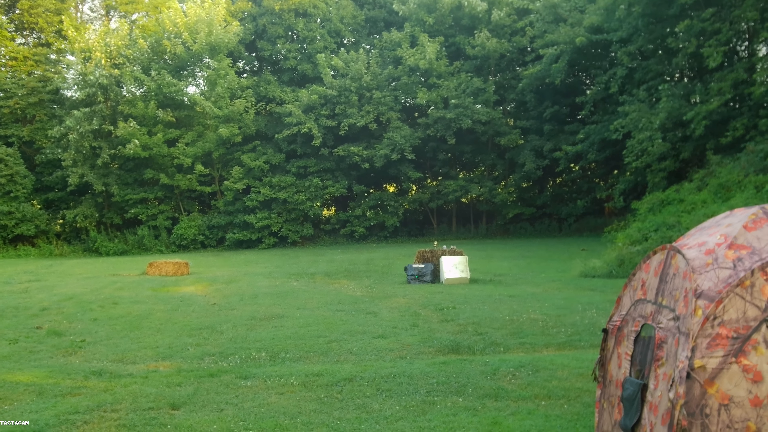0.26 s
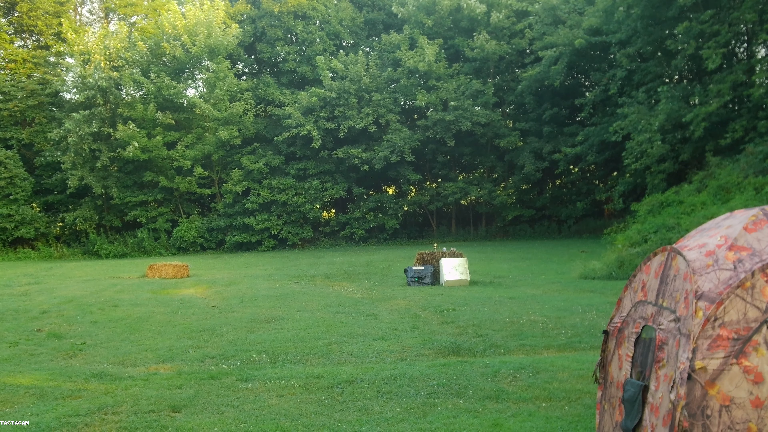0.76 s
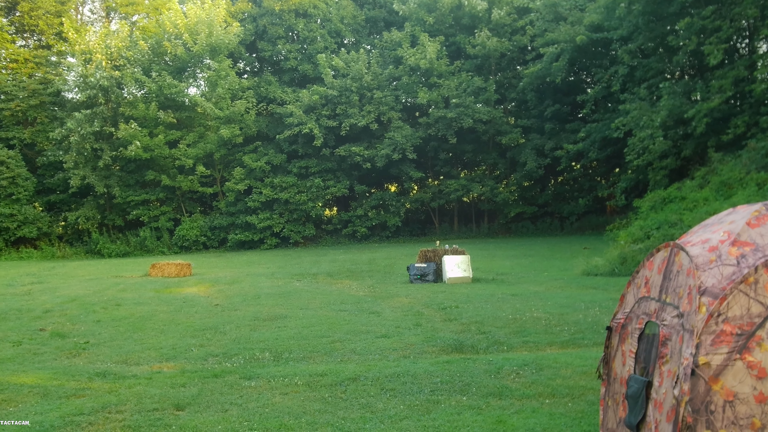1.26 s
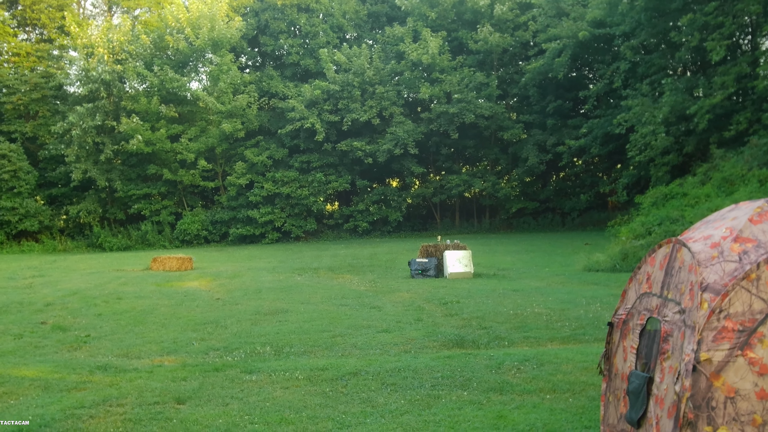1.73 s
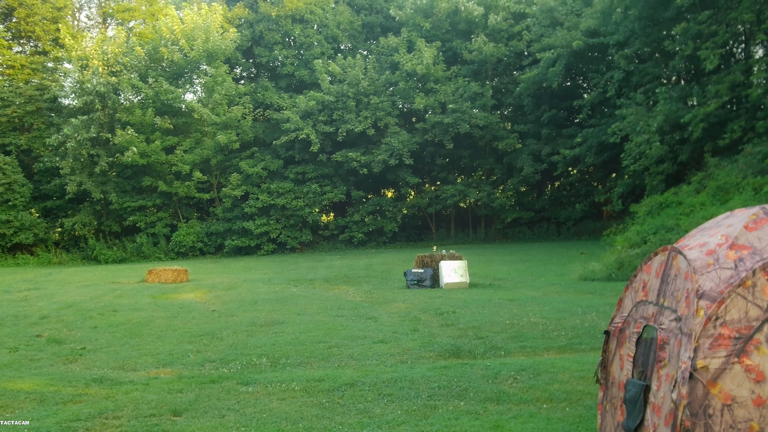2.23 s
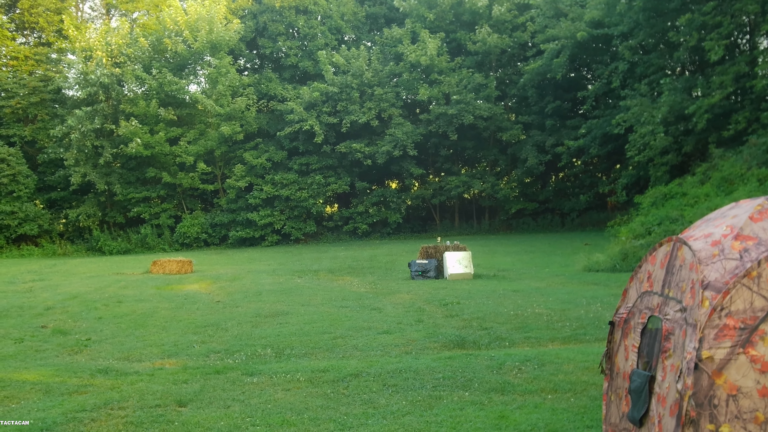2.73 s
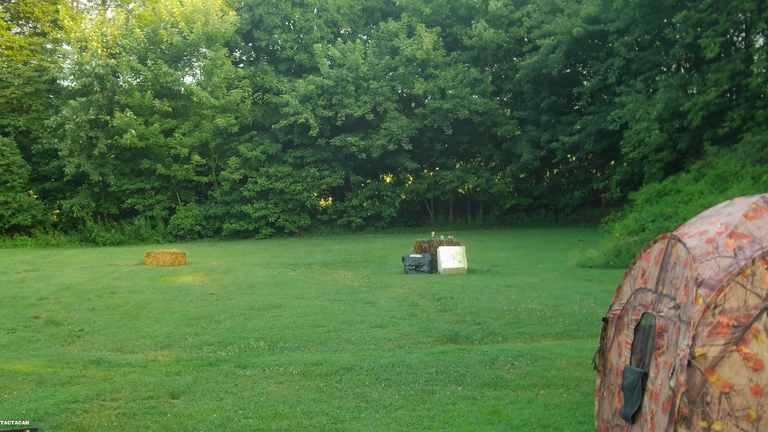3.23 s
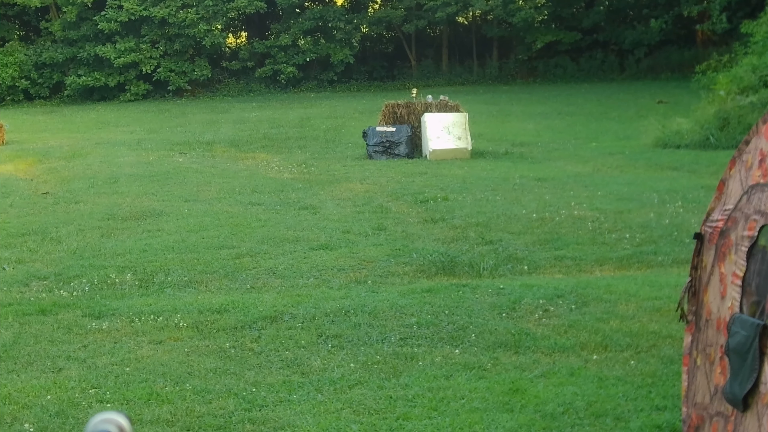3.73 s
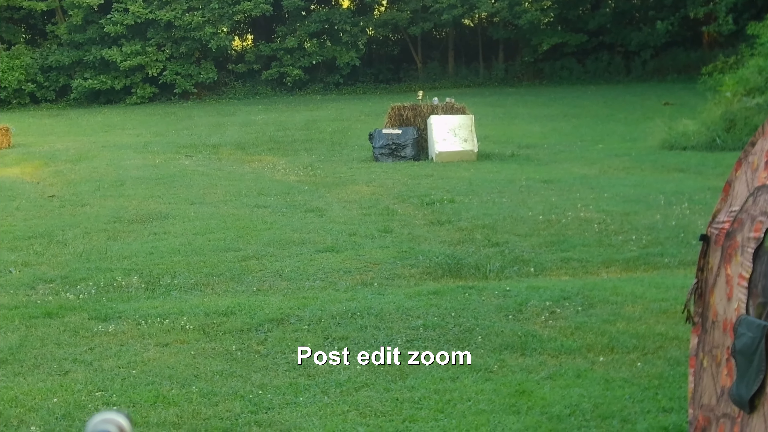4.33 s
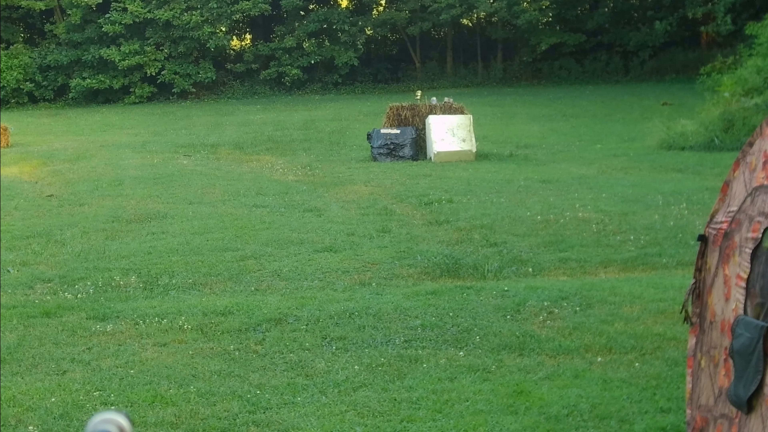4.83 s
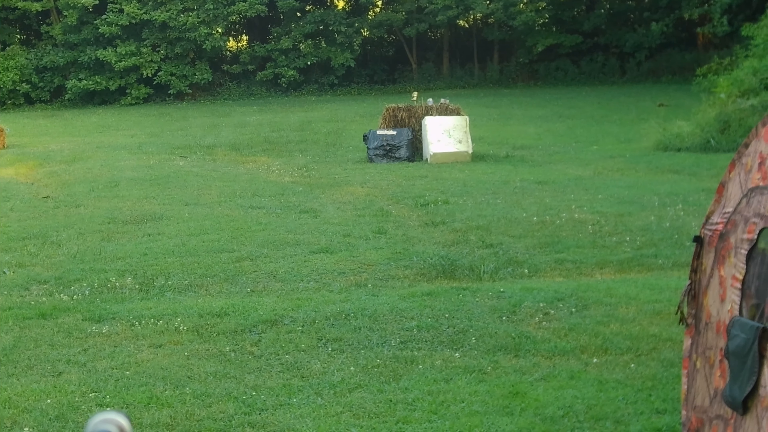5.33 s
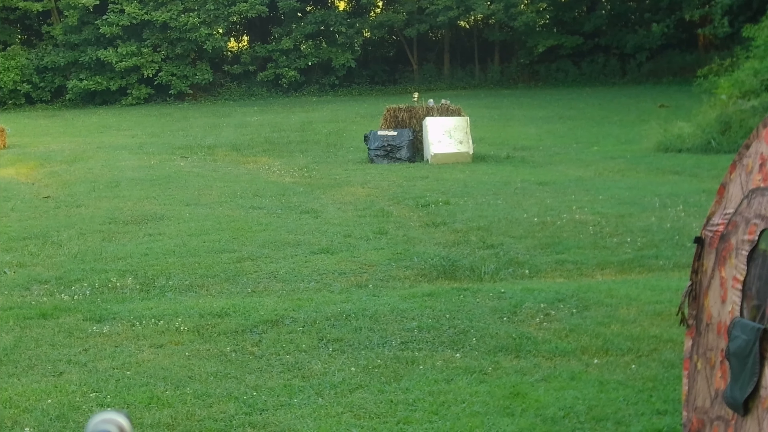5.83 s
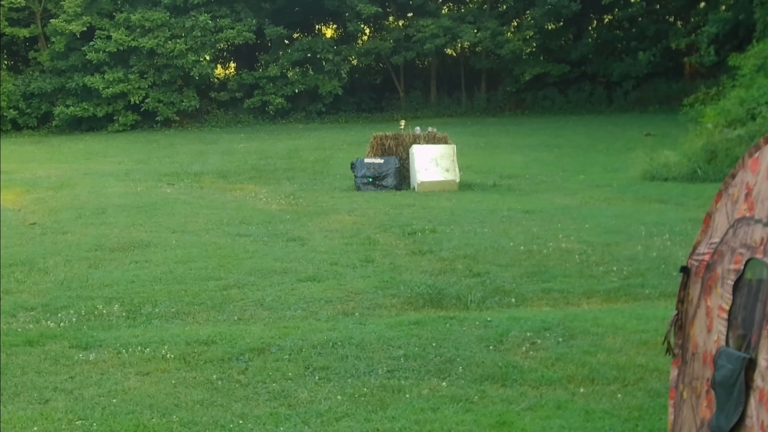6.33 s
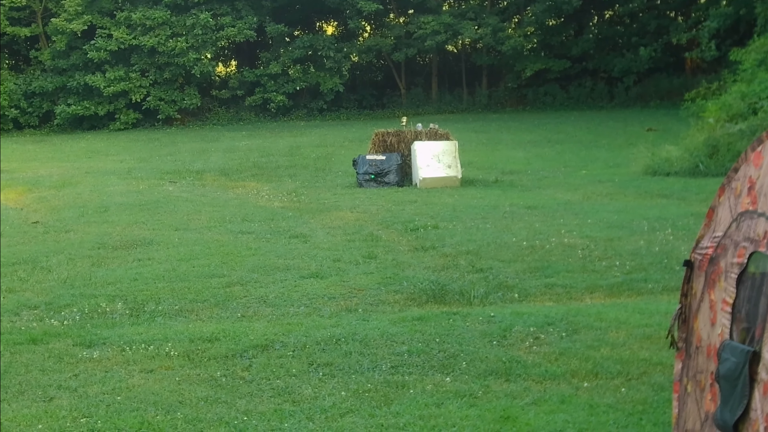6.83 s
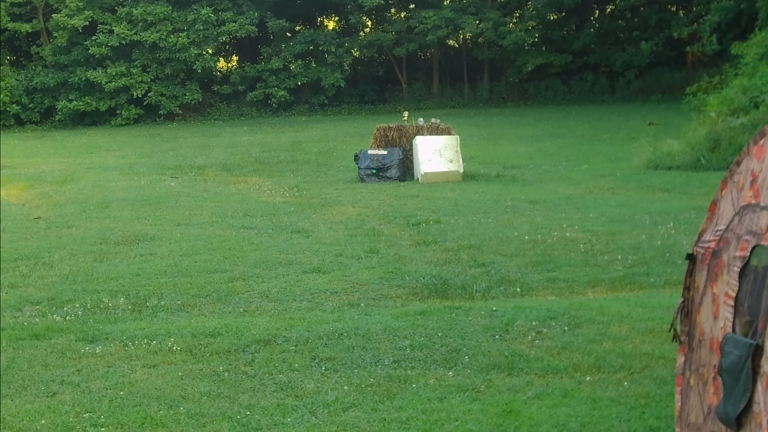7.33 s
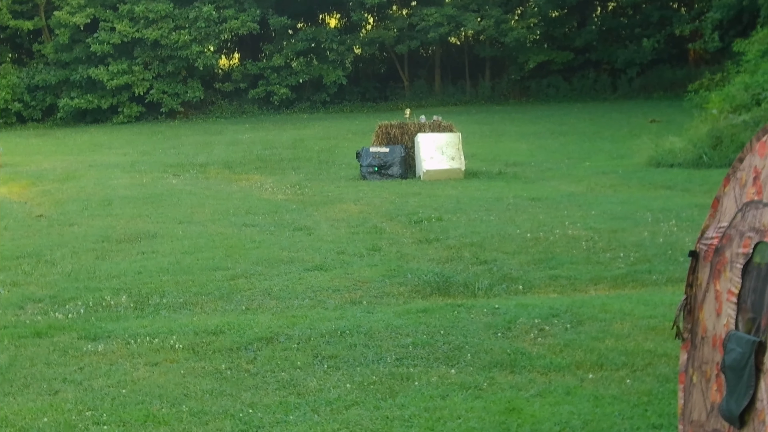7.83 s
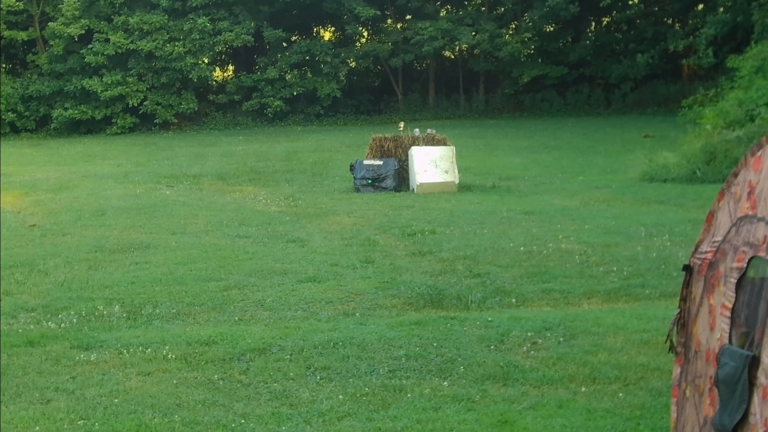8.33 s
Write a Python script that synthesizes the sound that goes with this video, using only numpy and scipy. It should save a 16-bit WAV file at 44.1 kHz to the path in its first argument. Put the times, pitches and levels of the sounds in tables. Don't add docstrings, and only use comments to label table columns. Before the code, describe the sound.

A mown field beside trees, heard from a microphone mounted on a crossbow, with slightly gritty compressed sound. At 0 s we drop into the loud, fading rattle and low ringing of a shot; a tiny high chirp at 0.15 s, then a sharp bolt smack on a far target at 0.35 s with short echoes. Quiet hush, thin insect hiss and breeze follow, faint two-note bird calls at 1.0 and 2.3 s, woody creaks and dull cloth rubbing at 1.6-1.8 s, more creaks and light brushes at 2.9-3.2 s. A booming button press clicks at 3.4 s. A tiny gap at 3.46 s, then calm with bird calls at 3.75 and 5.0 s. At 5.9 s the full shot bursts out, crackling, overloaded, rebounding and rattling; chirp at 6.1 s, target smack at 6.3 s, echoes, bird at 7.0 s, creaks at 7.5-7.8 s, bird at 8.2 s, quiet to the end at about 8.7 s.

```python
import sys
import numpy as np
from scipy import signal
from scipy.fft import rfft, irfft
from scipy.io import wavfile
from scipy.ndimage import uniform_filter1d

SR = 44100
rng = np.random.default_rng(int(sys.argv[2]) if len(sys.argv) > 2 else 0)


def natural_amplitude(level_db):
    exponent = np.asarray(level_db, float) / 20
    return 10 ** exponent


def generate_wav(signal):
    frames = np.transpose(np.atleast_2d(signal))
    scaled = np.clip(frames, -1, 1) * 32767
    pcm = np.round(scaled).astype(np.int16)
    wavfile.write(sys.argv[1], SR, pcm)


N = 377496

REPLAY_S, CUT_S = 263145 / SR, 3.46335
LONG = round((CUT_S + REPLAY_S) * SR)
RESTING_STEP_DB = -16


def rms_one(x):
    return x / np.sqrt(np.mean(x ** 2) + 1e-20)


def at_hz(points, hz):
    table = np.array(points)
    return np.interp(np.log(hz), np.log(table[:, 0]), table[:, 1])


def sample(s):
    return round((s + REPLAY_S * (s < CUT_S)) * SR)


def add(into, s, sound):
    part = into[sample(s):sample(s) + len(sound)]
    part += sound[:len(part)]


def seconds(length):
    return np.arange(round(length * SR)) / SR


def ring(x, hz, t60):
    r = natural_amplitude(-60 / (t60 * SR))
    w = 2 * np.pi * hz / SR
    return signal.lfilter([0, np.sin(w)], [1, -2 * r * np.cos(w), r * r], x + 1e-18)


def coloured(spectrum, size):
    hz = np.maximum(np.fft.rfftfreq(size, 1 / SR), 1)
    inside = (hz > spectrum[0][0]) & (hz < spectrum[-1][0])
    white = rfft(rng.standard_normal(size))
    return rms_one(irfft(white * natural_amplitude(at_hz(spectrum, hz)) * inside, size))


def drift(rate):
    knots = rng.standard_normal(4000)
    return np.interp(np.arange(LONG) * rate / SR, np.arange(len(knots)), knots)


def air():
    # (frequency [Hz], level [dB per Hz])
    field = [(12, -32.5), (20, -6.5), (32, -16.5), (129, -28), (266, -35.5), (298, -38), (333, -34),
             (427, -43), (686, -41), (3350, -60), (6910, -40), (8640, -62.5), (15500, -64.5)]
    far = [(hz, db) for hz, db in field if not 5500 < hz < 8400]
    breeze = coloured([(8, -6.0), (40, -2.5), (150, -19)], size=LONG) * natural_amplitude(-52.5 + 2.8 * drift(7.2))
    return natural_amplitude(-56 + drift(4.1)) * coloured(far, size=LONG) + breeze


def insects():
    # (frequency [Hz], level [dB per Hz])
    chorus = [(5500, -24), (6100, -4.5), (6900, -1.5), (7600, -6), (8200, -26)]
    # (time [s], peak level [dB], frequency [Hz])
    insect_snaps = [
        (5.3359, -53, 7050),
        (8.0743, -48, 7170),
    ]
    out = natural_amplitude(-70 + 1.3 * drift(32) + 0.79 * drift(4.2)) * coloured(chorus, size=LONG)
    t = seconds(.03)
    for s, peak_db, hz in insect_snaps:
        snap = ring(rng.standard_normal(len(t)) * np.exp(-t / 0.0041), hz, 0.022)
        add(out, s, natural_amplitude(peak_db) * snap / np.abs(snap).max())
    return out


def bird():
    # (start [s], length [s], top of the lower note [Hz], level [dB])
    calls = [
        (3.748, .078, 1785, -62),
        (5.04, .078, 1800, -63),
        (6.976, 0.083, 1760, -60.5),
        (8.223, .075, 1806, -62),
    ]
    # (frequency [Hz], level [dB])
    throat = [(1000, -12), (1450, 1.5), (1580, -7), (1710, -0.5), (1830, -2)]
    out = np.zeros(LONG)
    for s, length, top_hz, level_db in calls:
        u = seconds(length) / length
        wobble = [np.interp(u * 12, np.arange(13), rng.standard_normal(13)) for k in range(3)]
        low_arch = 1 - 2.7 * np.abs(u - .48) ** 3.0 + 0.011 * wobble[2]
        high_arch = 1 - 0.85 * np.abs(u - .7) ** 3.3 - 4.0 * np.maximum(u - .75, 0) ** 2
        high_arch = high_arch + 0.016 * wobble[2]
        low_db = at_hz(throat, top_hz * low_arch) + 1.9 * wobble[0]
        high_db = -7 + 3.9 * wobble[1] - 7.4 * u ** 3
        low = natural_amplitude(low_db) * np.sin(2 * np.pi * top_hz * np.cumsum(low_arch) / SR)
        high = natural_amplitude(high_db) * np.sin(2 * np.pi * 1.79 * top_hz * np.cumsum(high_arch) / SR)
        call = np.sqrt(2) * np.sin(np.pi * u) ** 0.21 * (low + high)
        for lag, echo_db in [(0, -1.5), (.007, -4.5), (.017, -11.5), (.04, -19)]:
            add(out, s + lag, natural_amplitude(level_db + echo_db) * call)
    return out


def sleeve():
    # (start [s], length [s], level [dB])
    brushes = [
        (2.951, 0.046, -67),
        (3.176, 0.069, -67),
    ]
    rise_s, hold_s, fall_s = 0.046, .22, 0.09
    out = np.zeros(LONG)
    t = seconds(rise_s + hold_s + fall_s)
    shape = np.minimum(np.minimum(t / rise_s, t[::-1] / fall_s), 1)
    cloth = coloured([(200, 10), (500, 6), (1400, -8.5), (1700, -14.0)], size=len(t))
    add(out, 7.54, natural_amplitude(-65) * shape * cloth)
    for start, length, brush_db in brushes:
        u = seconds(length) / length
        brush = coloured([(900, 3), (5000, -4), (12000, -13)], size=len(u))
        add(out, start, natural_amplitude(brush_db) * np.sin(np.pi * u) * brush)
    return out


def hands():
    # (time [s], peak level [dB], thump level [dB], tick level [dB])
    creaks = [(2.855, -63, -65, -73), (2.923, -47, -51, -54.5), (2.968, -64, -62, -73),
              (3.199, -58, -65, -75), (3.224, -57, -52, -70), (7.544, -53.5, -56, -70),
              (7.568, -42, -38, -67), (7.604, -42, -58, -69), (7.613, -49, -36, -68),
              (7.625, -44, -46, -67), (7.656, -52, -51, -70), (7.673, -46.5, -48, -67),
              (7.699, -50, -45, -65), (7.724, -57, -50, -66), (7.775, -49, -58, -55.5)]
    out, t = np.zeros(LONG), seconds(.09)
    for s, peak_db, thump_db, tick_db in creaks:
        rub = rng.standard_normal(len(t)) * np.exp(-t / 0.0081)
        scratch = rng.standard_normal(len(t)) * np.exp(-t / 0.0047)
        body = rms_one(ring(rub, 499, 0.023))
        body += 0.73 * rms_one(ring(rub, 850, 0.0064))
        body += 0.4 * rms_one(ring(rub, 1300, 0.016))
        body = signal.sosfilt(signal.butter(8, 1600, fs=SR, output="sos"), body)
        tick = rms_one(ring(scratch, 2640, 0.0055))
        tick += 0.59 * rms_one(ring(scratch, 4020, 0.0052))
        tick += 0.46 * rms_one(ring(scratch, 4000, .0008))
        thump = np.sin(2 * np.pi * 88 * t) * np.exp(-t / 0.036) * np.minimum(t / 0.0036, 1)
        add(out, s, natural_amplitude(peak_db) * body / np.abs(body).max() + natural_amplitude(thump_db - 2) * thump)
        add(out, s, natural_amplitude(tick_db + 6.5) * tick / np.abs(tick).max())
    return out


def button():
    # (frequency [Hz], level [dB], time to fall 60 dB [s])
    case_modes = [(915, -27, 0.0056), (1280, -9, 0.011), (2720, -23, 0.012), (5700, -7, 0.0064),
                  (9150, -4, 0.0037), (11600, -6, 0.0033)]
    press_s, let_go_s = 3.37724, 3.3955
    out, t = np.zeros(LONG), seconds(.12)
    squeeze = seconds(.1)[::-1]
    add(out, press_s - .1, -.22 * np.exp(-squeeze / .0007) - .045 * np.exp(-squeeze / .015))
    swing_back = .4 * (1 - 1.75 * np.exp(-(t - .0012) / .002)) * np.exp(-t / .013)
    shove = np.where(t < .0012, -.95, swing_back)
    snaps = rng.standard_normal(len(t)) * np.exp(-t / .0008) * .1
    snaps[[22, 57]] += [1, .6]
    case = sum(natural_amplitude(db) * ring(snaps, hz, t60) for hz, db, t60 in case_modes)
    add(out, press_s, shove + case)
    add(out, let_go_s, natural_amplitude(-29.0) * rng.standard_normal(len(t)) * np.exp(-t / 0.0013))
    return out


def target():
    # (time [s], peak level [dB], length [s])
    smacks = [
        (6.3161, -11, .0034),
        (6.3455, -31, .004),
        (6.3505, -29, .006),
        (6.481, -46, .003),
        (6.496, -41, .004),
    ]
    # (frequency [Hz], level [dB per Hz])
    trees = [(59, -31), (100, -6), (381, -13), (855, -20), (922, -25.5), (1320, -22), (1720, -36),
             (1890, -23.5), (9000, -46), (11700, -61), (19800, -120)]
    out, hit_s = np.zeros(LONG), smacks[0][0]
    for s, peak_db, length in smacks:
        u = seconds(length) / length
        push = np.minimum(u / .1, 1) ** 2 * np.cos(1.5 * np.pi * u) * (1 - .2 * u)
        click = np.eye(1, len(u), 4)[0]
        tip = signal.sosfilt(signal.butter(4, 11 / length, fs=SR, output="sos"), click)
        grit = 0.033 * rng.standard_normal(len(u))
        add(out, s, natural_amplitude(peak_db) * (push + 0.83 * tip / tip.max() + grit))
    t = seconds(1.0)
    tail = natural_amplitude(-43.5 - 60 * t / .35) + natural_amplitude(-53.5 - 60 * t / 1.32)
    add(out, hit_s + 0.0048, coloured(trees, size=len(t)) * tail)
    swell = natural_amplitude(-69.5) * np.exp(-((t - .26) / .04) ** 2)
    add(out, hit_s, coloured([(700, 2), (2500, 4), (3600, -17)], size=len(t)) * swell)
    return out


def squeak():
    # (time [s], frequency [Hz], level [dB], length [s])
    chirps = [
        (6.118, 13300, -46, 0.011),
        (6.122, 11950, -61, 0.01),
    ]
    out = np.zeros(LONG)
    for s, hz, db, length in chirps:
        t = seconds(length)
        add(out, s, natural_amplitude(db) * np.sin(np.pi * t / length) * np.sin(2 * np.pi * hz * t))
    return out


def bow():
    # (time [s], level [dB])
    blows = [
        (5.9068, 12.5),
        (5.921, 14.5),
        (5.9406, 10),
        (5.985, -1.5),
        (6.0307, -13),
    ]
    # (frequency [Hz], level [dB], time to fall 60 dB [s])
    limb_modes = [(159.9, -8, .25), (335.3, -10.5, .15), (441.3, -10, .15), (534, -9, 0.17),
                  (783, -5.5, 0.13), (909.6, -7, 0.067), (1056, -6.5, 0.1), (1239, -9, 0.13),
                  (1480, -13, 0.054), (1726, -14.5, 0.037), (2466, -19, 0.12), (2870, -22, 0.023)]
    # (frequency [Hz], level [dB], time to fall 60 dB [s])
    sway_modes = [(41.06, -16, 0.53), (26.95, -11, 0.31), (106.5, 3, .1)]
    # (frequency [Hz], level [dB per Hz])
    rattle = [(40, -7), (160, 1), (280, -10), (500, -6), (1050, -6), (1600, -21), (2500, -17.5),
              (4000, -25.5), (8000, -34.5), (15800, -45.5)]
    # (frequency [Hz], time to fall 60 dB [s])
    rattle_t60 = [(80, 0.45), (300, 0.45), (1000, 0.33), (2500, 0.27), (5000, 0.25), (9000, 0.31),
                  (15000, 0.17)]
    out, t = np.zeros(LONG), seconds(1)
    start, modes = blows[0][0], list(limb_modes) + list(sway_modes)
    clicks = np.zeros((len(modes), len(t)))
    for s, blow_db in blows:
        chance = rng.standard_normal(len(modes))
        clicks[:, round((s - start) * SR)] = natural_amplitude(blow_db + 3.0 * chance) * np.sign(chance + 0.28)
    shot = sum(natural_amplitude(db - 11.5) * ring(c, hz, t60) for c, (hz, db, t60) in zip(clicks, modes))

    noise = rfft(coloured(rattle, size=len(t)))
    hz, edges = np.fft.rfftfreq(len(t), 1 / SR), np.geomspace(50, 16000, num=18)
    for low, high in zip(edges, edges[1:]):
        band = irfft(noise * ((hz >= low) & (hz < high)), len(t))
        t60 = at_hz(rattle_t60, np.sqrt(low * high))
        slam = natural_amplitude(15 - 60 * t / 0.14)
        slam += natural_amplitude(-14 - 60 * (t - .1) / 0.18) * (t > .1) * (700 < low < 2900)
        patchy_db = 4.4 * np.interp(t * 45, np.arange(46), rng.standard_normal(46))
        shot += band * (natural_amplitude(-6.5 + patchy_db - 60 * t / t60) + slam) * (1 - np.exp(-t / 0.0032))

    crackle = rng.standard_normal(len(t)) * natural_amplitude(14 - 60 * t / 0.011) * (1 - np.exp(-t / 0.00035))
    sway = natural_amplitude(-3 - 60 * t / .5) * np.sin(2 * np.pi * 40.5 * t)
    add(out, start, shot + crackle + sway)
    answer = natural_amplitude(-61.5) * np.exp(-((t - .21) / .09) ** 2)
    add(out, start, answer * coloured([(1000, 0), (3000, -4), (6000, -11)], size=len(t)))
    trigger = seconds(0.0077)
    add(out, start - .0026, rng.standard_normal(len(trigger)) * natural_amplitude(-32.5 + 14 * trigger / 0.0057))
    return out


def scene():
    # (time [s], depth [dB], recovery [s])
    dips = [
        (5.91, -2, 1),
        (11, -3.5, 0.12),
    ]
    gain_db, t = np.zeros(LONG), seconds(2)
    for s, depth_db, recovery in dips:
        add(gain_db, s, depth_db * np.exp(-t / recovery))
    background = natural_amplitude(gain_db) * (air() + insects() + bird())
    whole = background + sleeve() + hands() + button() + target() + squeak() + bow()
    cut = round(CUT_S * SR)
    return np.concatenate([whole[LONG - cut:], whole[cut:N]])[None]


def step_db(at_sample):
    # (time [s], step on the blow [dB], step while in debt [dB], debt lasts [s])
    drains = [
        (5.907, -27, 5.5, .37),
        (6.316, -3, 1, .16),
        (3.377, -26, 1, .09),
    ]
    out = np.full(len(at_sample), float(RESTING_STEP_DB))
    for s, fine_db, debt_db, lasts in drains:
        t = (at_sample - sample(s)) / SR
        repaid = np.exp(-np.maximum(t - lasts, 0) / 0.19)
        owed_db = RESTING_STEP_DB + (debt_db - RESTING_STEP_DB) * repaid
        climbing_db = fine_db + 499.5 * np.maximum(t - .012, 0)
        out = np.where(t > -.032, np.minimum(climbing_db, owed_db), out)
    return out


def camera_rounding(x, start_s):
    frame = 941
    lead = frame + round((start_s - 5.888) * SR) % frame
    padded = np.pad(x, (lead, 2 * frame - (lead + len(x)) % frame))
    n, k = np.arange(2 * frame) + .5, np.arange(frame) + .5
    line_hz = k * SR / 2 / frame
    window = np.sin(np.pi * n / (2 * frame))[:, None]
    basis = window * np.cos(np.pi / frame * np.outer(n + frame / 2, k)) * np.sqrt(2 / frame)
    halves = padded.reshape(-1, frame)
    lines = np.hstack([halves[:-1], halves[1:]]) @ basis
    band_db = 10 * np.log10(uniform_filter1d(lines ** 2, size=41, axis=1) + 1e-14)

    middle = start_s * SR - lead + frame * np.arange(1, len(lines) + 1)
    coarse_db = step_db(middle)[:, None]
    treble_db = 5.5 * np.log2(np.clip(line_hz, 250, 9000) / 2000)
    treble_db = treble_db + 9 * (line_hz > 3600) * np.clip(1 + coarse_db / 10, 0, 1)
    uneven_db = 3 * np.repeat(rng.standard_normal((len(lines), 48)), 20, axis=1)[:, :frame]
    step = natural_amplitude(band_db + np.minimum(coarse_db + treble_db + uneven_db, 10))
    lapse = (rng.random((len(lines), 1)) < .06) & (coarse_db > RESTING_STEP_DB - 1)
    typical_db = np.median(band_db, axis=1, keepdims=True)
    step = np.maximum(step, lapse * natural_amplitude(typical_db + 11))
    step[:, :6] = 1e-5

    lines[:, line_hz > 15700] = 0
    rounded = np.trunc(lines / step + .4 * np.sign(lines)) * step
    back = rounded @ (basis.T)
    return (back[1:, :frame] + back[:-1, frame:]).ravel()[lead - frame:][:len(x)]


def band_limit(x):
    return signal.sosfilt(signal.butter(12, 15850, fs=SR, output="sos"), x)


def record(dry):
    x = .87 * np.tanh(dry[0] / .87 * (1 + .4 * np.minimum(dry[0] ** 2, 9)))
    cut = round(CUT_S * SR)
    first = camera_rounding(x[:cut], REPLAY_S)
    second = camera_rounding(x[cut:], CUT_S)
    x = np.concatenate([first, second]) + .013
    x[cut - round(.002 * SR):cut] = 0
    return band_limit(x[None])


dry = scene()
out = record(dry)
generate_wav(out)
```